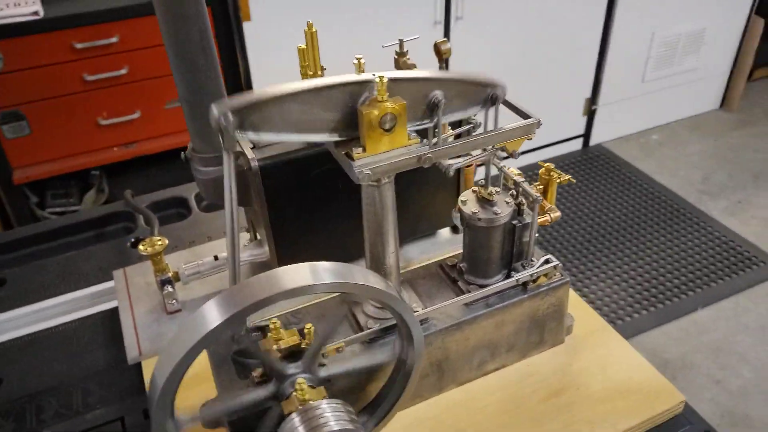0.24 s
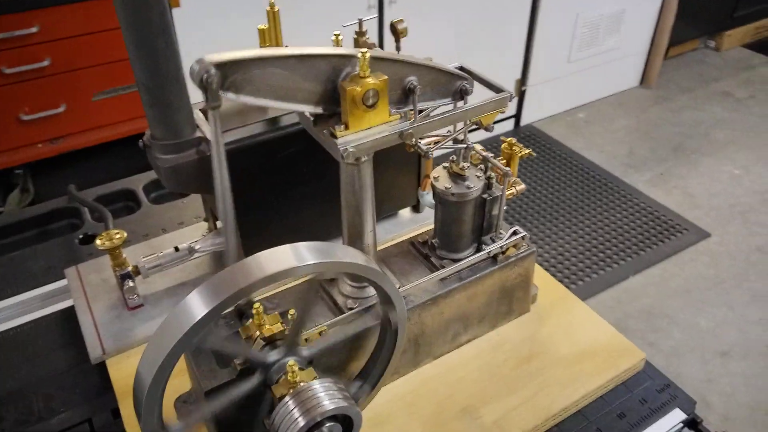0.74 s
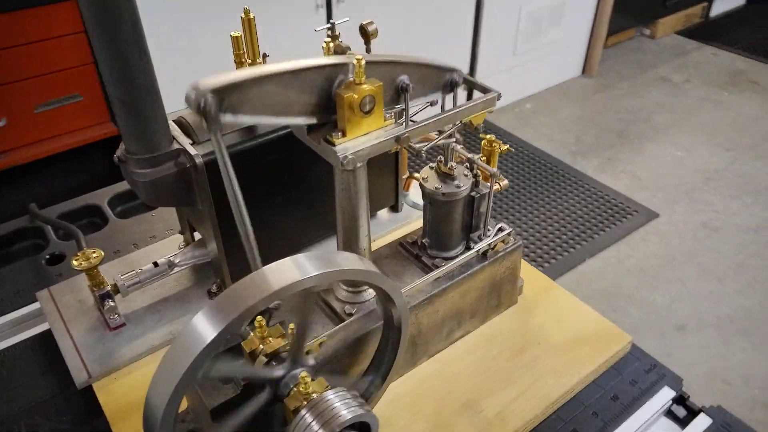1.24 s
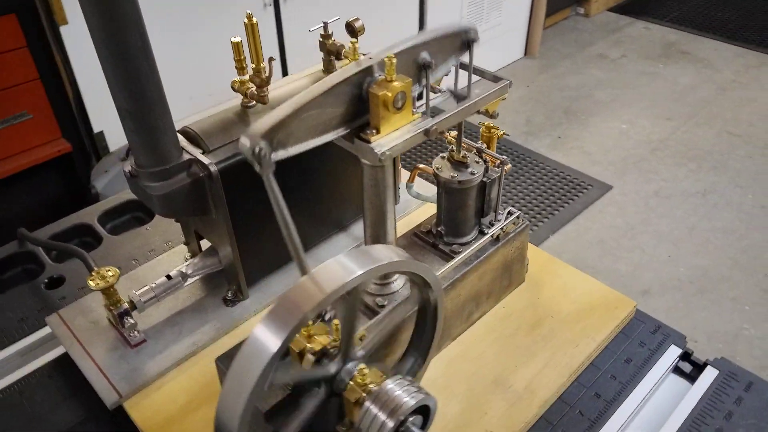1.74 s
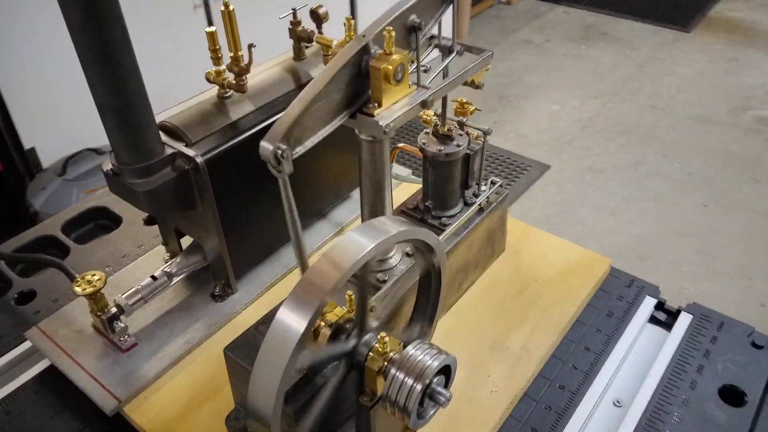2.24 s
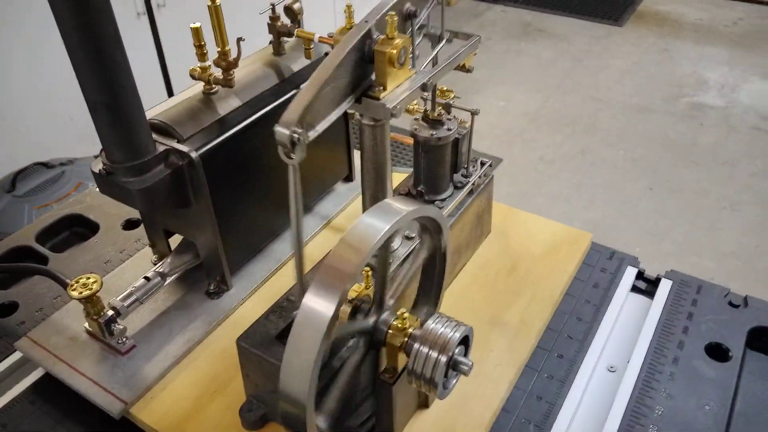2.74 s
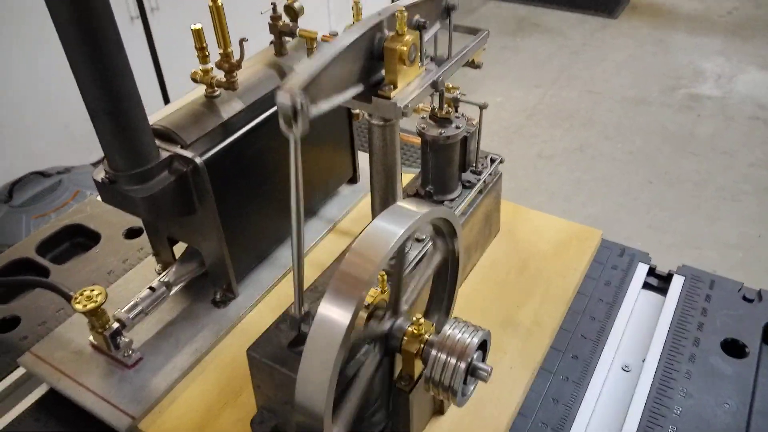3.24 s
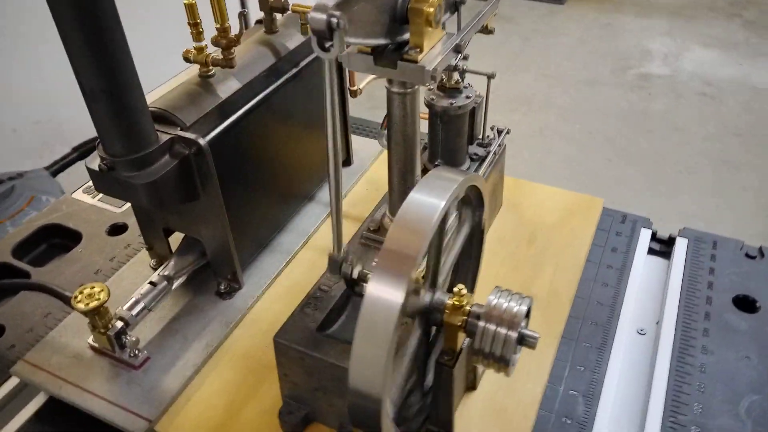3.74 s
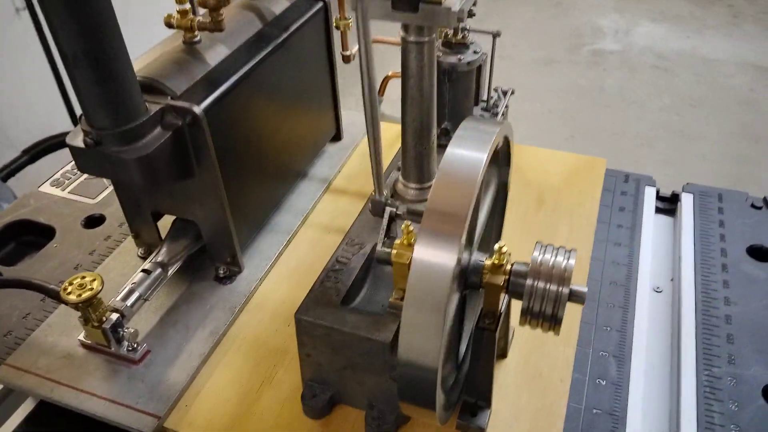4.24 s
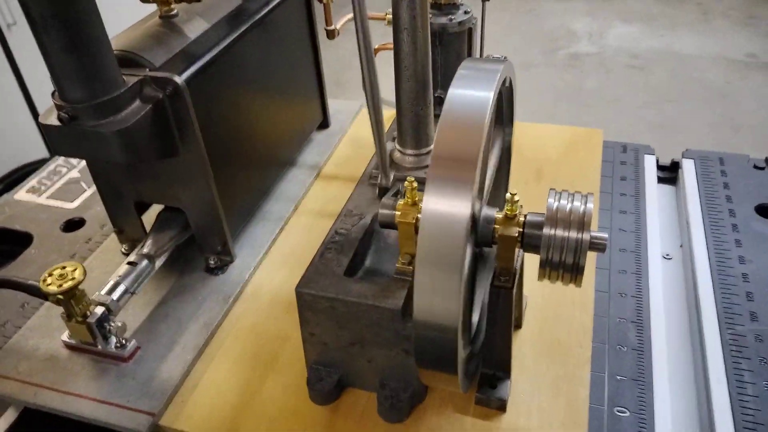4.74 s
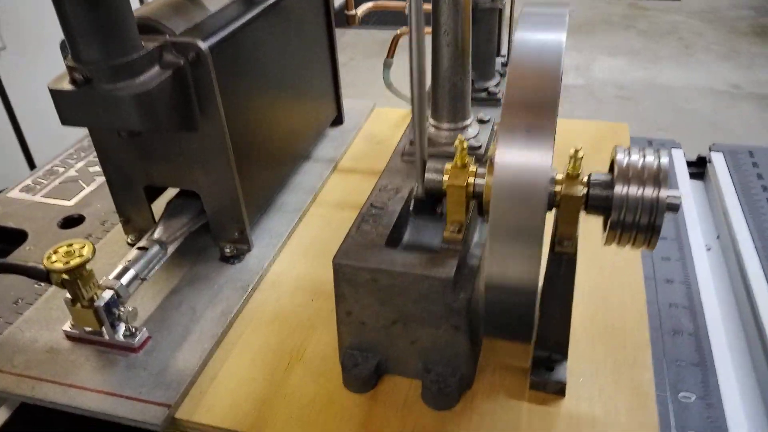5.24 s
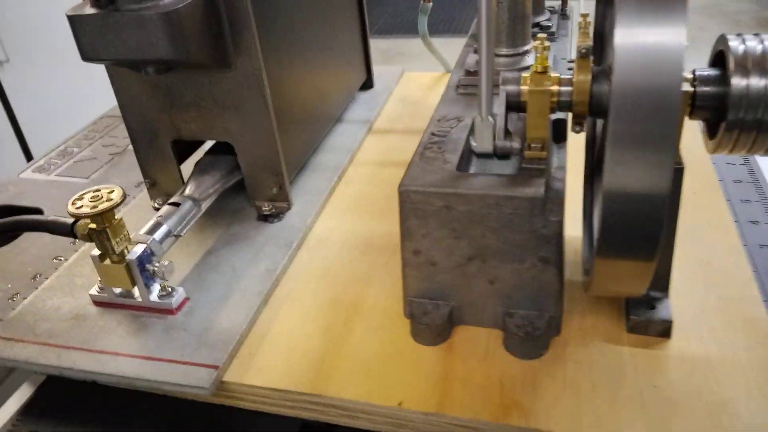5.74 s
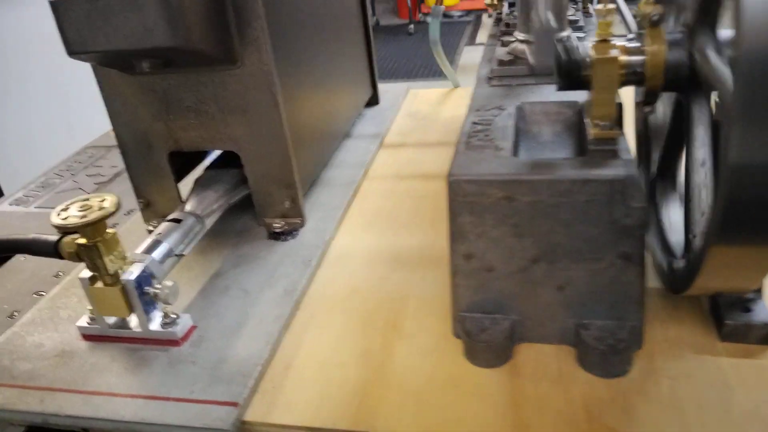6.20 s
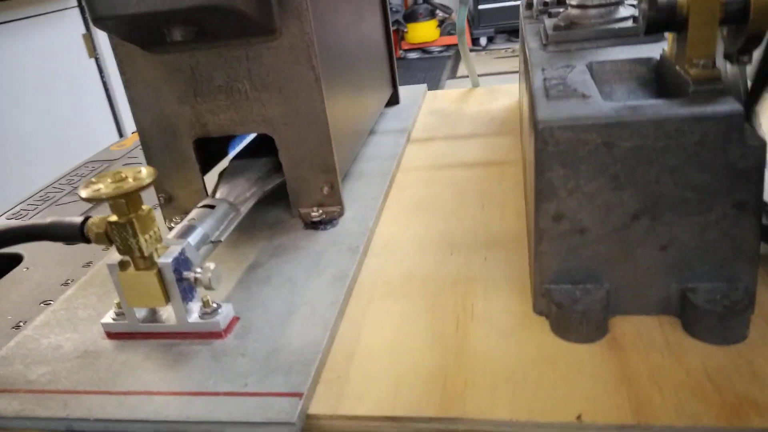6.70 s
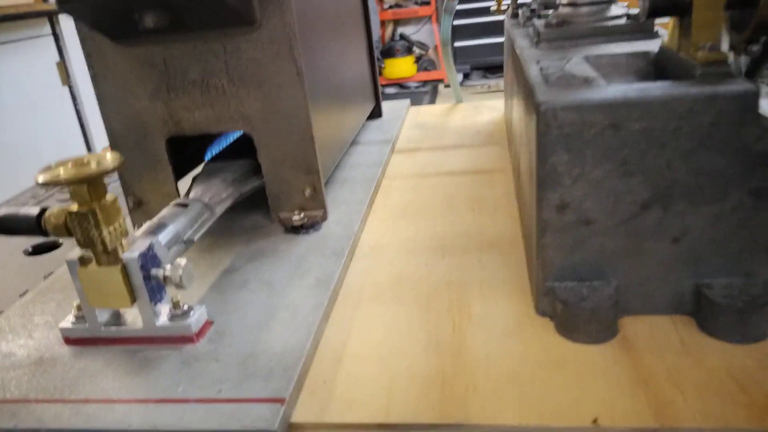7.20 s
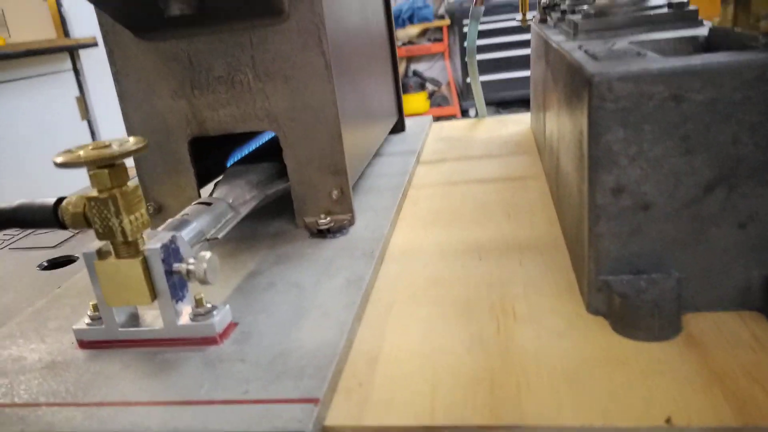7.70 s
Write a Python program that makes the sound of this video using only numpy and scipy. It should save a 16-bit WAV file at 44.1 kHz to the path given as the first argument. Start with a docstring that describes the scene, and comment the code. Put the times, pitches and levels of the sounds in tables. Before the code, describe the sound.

Close handheld stereo in a quiet indoor workshop: steady bright gas-jet hiss, its tone gliding as the microphone moves. Dense little metallic ticks and linkage rattle come first, with a squeaking pin and ragged chuffs; ticks then thin out. Soft bubbling exhaust puffs recur throughout. Later the rattle turns duller, knocks and gurgles thicken again, and the burner hiss swells.

```python
"""A model beam engine runs beside its gas-fired boiler while a camera with two microphones circles the burner.
Throughout, filtered noise makes the jet's hiss, combed by gliding echoes; noise and slips shaken through frame
resonances make the linkage rattle; decaying tones tick, wet exhaust gurgles in puffs, and the room hums faintly.
A dry pin squeals in the first two seconds; dry steam chuffs until 3.5 s, and twice the jet's roar collapses.
From 4.4 s the camera closes in: far echo paths shorten, and the rattle is more shaded from about 5 s."""
import sys
import numpy as np
from scipy import signal
from scipy.fft import rfft, irfft, next_fast_len
from scipy.io import wavfile
from scipy.ndimage import map_coordinates

SR = 44100
rng = np.random.default_rng(int(sys.argv[2]) if len(sys.argv) > 2 else 0)


def materialize(psi):
    """Save the field psi as 16-bit PCM at rate SR to the path in sys.argv[1].

    A 1-D psi becomes a single channel; in a 2-D psi each row is a channel.
    """
    bounded = np.clip(np.atleast_2d(psi).T, -1, 1)
    quanta = np.round(bounded * 32767).astype(np.int16)
    wavfile.write(sys.argv[1], SR, quanta)


N = 351036
TIME = np.arange(N) / SR

# puffs of wet exhaust: t/s, length/s, relative level/dB, lowest resonance at the start f/Hz
PUFFS = [(0.315, 0.07, -83, 410), (0.52, 0.062, -70, 490), (0.755, 0.19, -68, 396),
         (1.175, 0.026, -70, 500), (1.488, 0.065, -73, 540), (1.701, 0.1, -70, 500),
         (1.95, 0.036, -72, 430), (2.111, 0.18, -70, 318), (2.444, 0.041, -72, 466),
         (2.559, 0.1, -71.5, 393), (2.883, 0.15, -71.5, 380), (3.703, 0.2, -70, 332),
         (4.168, 0.047, -76, 414), (4.564, 0.064, -68, 407), (4.688, .07, -70, 417), (4.86, 0.02, -73, 470),
         (5.06, 0.244, -70.5, 300), (5.452, .05, -75, 430), (6.3, 0.091, -68.5, 450),
         (6.53, .25, -65.5, 320), (7.05, 0.077, -69, 430), (7.319, 0.11, -69, 422), (7.53, 0.15, -67, 388),
         (7.774, 0.11, -63, 392)]
PUFF_RELEASE_S, PUFF_RISE_HZ_PER_S = 0.053, 600
# resonances of the exhaust: multiple of the lowest/1, relative level/dB
EXHAUST_MODES = [(1, 5), (1.95, -29), (3.6, -11)]


def gas_jet():
    """Turbulent hiss and beamed fizz, coloured by the echoes at each moving microphone."""
    return swept(jet_flow(), jet_gain, size=2048)


def jet_flow():
    """Turbulence as noise with random spits, fluttering in level; its treble spurts."""
    # flutter: random knots/(1/s), depth/dB
    flutter = [(12, .4), (45, .38)]
    # spurts of brighter fizz: t/s, length/s, boost/dB
    spurts = [(.01, 0.033, 1), (0.625, 0.074, 6), (3.155, 0.059, 7.5), (3.492, 0.077, 6)]
    spits_per_s = 110
    spits = (rng.random(N) < spits_per_s / SR) * rng.uniform(-1.06, 1, N)
    flutter_db = sum(depth_db * wobble(per_s) for per_s, depth_db in flutter)
    flutter_db = flutter_db + 0.1 * np.array([wobble(250), wobble(220)])  # each side apart
    flow = (noise_pair(alike=.88) + 8.5 * spits) * amp(flutter_db)
    spurt_db = sum(db * envelope(s, length, attack_s=0.0052, release_s=0.018) for s, length, db in spurts)
    return flow + filtered(flow, jet_treble) * (amp(spurt_db) - 1)


def jet_treble(hz):
    """Share of the jet that counts as fizz at each frequency."""
    return np.interp(hz, [7500, 9500], [0, 1])


def jet_gain(hz, t):
    """Moving jet spectrum; hiss and fizz each held to a level and pan."""
    # hiss, following the camera's view of the burner: t/s, relative level/dB, pan L-R/dB
    hiss_levels = [(0, -50, -8.5), (.26, -50, -9.5), (.62, -50, -10), (.71, -55, -12.5),
                   (1.15, -55.5, -7.5), (1.6, -51.5, -9), (1.86, -50, -9), (2.25, -47, -7.5),
                   (2.85, -47.5, -9), (3.18, -44, -6), (3.3, -49.5, -8.5), (3.55, -45.5, -7.5),
                   (4.3, -47.5, -8.5), (5.15, -46, -8.5), (5.45, -49, -2.5), (5.9, -47.5, -3.5),
                   (7.0, -47.5, -1.2), (7.919, -40.5, 1)]
    # beamed fizz above the hiss: t/s, relative level/dB, pan L-R/dB
    fizz_levels = [(0, -55.5, 14), (.55, -52.5, 7.5), (.95, -56.5, 7), (1.4, -56, 2.5), (1.9, -55, 5),
                   (2.3, -51, 3), (2.9, -52, 5.5), (3.7, -50.5, 3), (4.6, -49.5, -1), (5.1, -47, 5),
                   (6.15, -46.5, 5), (6.5, -48, 13), (7.05, -47.5, 13), (7.55, -48.5, 18.5),
                   (7.96, -49, 19.5)]
    # the jet reaches the right microphone first: t/s, lag of the left/ms
    left_lag = [(0, 0.16), (2, 0.2), (4, 0.24), (5, 0.257), (7.96, 0.23)]
    left, right = jet_echoes(hz, t)
    no_bass = hz[:, None] ** 4 / (hz[:, None] ** 4 + 1300 ** 4)  # jet too small for low tones
    lagged_left = left * delay(hz, curves(left_lag, t)[0])
    colour = jet_level(hz, t) * no_bass * [lagged_left, right]
    fizz = jet_treble(hz)[:, None]
    hiss_part = at_level(colour * (1 - fizz), hiss_levels, 0.5, t)
    return hiss_part + at_level(colour * fizz, fizz_levels, 3.5, t)


def jet_level(hz, t):
    """Source colour with a moving lower edge, tilt and a roar that collapses and rebuilds."""
    # colour of the jet: f/Hz, left/dB, right/dB
    colour = [(1020, -23, -16.5), (2220, -12, -11.5), (2600, -5, -4.5), (3240, -6.5, -2.5),
              (3920, -6, -5.5), (4350, 0, -6.5), (5370, -1.5, -2), (6440, -1.5, -0.5), (7170, -5.5, -0.5),
              (8370, -3, -7.5), (10300, -8, -15.5), (10800, -7.5, -23), (13500, -7.5, -17.5),
              (15300, -3, -14.5)]
    # lower edge as the burner's mouth comes into view: t/s, edge f/Hz, gain below/dB, tilt/(dB/octave)
    edge = [(0, 3270, -1.5, 8), (1.15, 3180, 0, 0.5), (2.3, 3540, -11, -6), (3.4, 3640, -12.5, -1),
            (4.3, 3040, -7.5, 5), (5.2, 3350, -9.5, 0), (5.9, 2700, 2, 1.5), (6.9, 2510, -14.5, -0.5),
            (7.96, 2920, -13, -2)]
    # mid-treble roar, collapsing at a spurt and slowly rebuilding: t/s, relative level/dB
    roar = [(0, 0), (.62, -1.5), (.67, -6.5), (1.2, -2), (1.55, 1.5), (3.19, 1), (3.24, -6), (3.6, 0.5),
            (4.2, 1.5)]
    roar_hz, roar_width_hz = 4700, 890
    edge_hz, drop_db, tilt_db = curves(edge, t)
    octaves = np.log2(np.clip(hz, 3500, 7500) / 5500)[:, None]
    roar_db = curves(roar, t)[0] * np.exp(-((hz[:, None] - roar_hz) / roar_width_hz) ** 2)
    below_edge_db = drop_db / (1 + (hz[:, None] / edge_hz) ** 20)
    return amp(along(colour, hz)[..., None] + below_edge_db + tilt_db * octaves + roar_db)


def jet_echoes(hz, t):
    """Interference of near and far echoes with the jet, separately at each microphone."""
    # near echoes, left: pressure share/1, delay/ms at each of the four camera places
    echoes_left = [(0.21, 0.331, 0.263, 0.26, 0.18), (0.2, 0.226, 0.303, 0.308, 0.2515),
                   (0.06, 0.475, 0.475, 0.47, 0.283), (0.15, 0.868, 0.726, 0.807, 0.745),
                   (0.24, 0.762, 1.081, 0.99, 0.87)]
    # near echoes, right: same columns
    echoes_right = [(0.24, 0.13, 0.27, 0.29, 0.419), (0.38, 0.25, 0.17, 0.15, 0.208),
                    (0.15, 0.411, 0.48, 0.29, 0.408), (0.14, 0.744, 0.914, 0.623, 0.575),
                    (0.22, 0.885, 1, 0.902, 0.8)]
    # near surface cancels or reinforces, left: gain/dB, half width/Hz, path of (t/s, f/Hz)
    bands_left = [(-19, 380, [(1.25, 7900), (1.95, 8100), (2.35, 9400), (4.4, 9300), (4.95, 8900)]),
                  (-25, 360, [(4.55, 6340), (5.15, 6740), (5.5, 7470), (6.1, 8460)]), (12, 92, [(5.2, 5700),
                  (6.2, 6630), (6.9, 7160)]), (-1, 200, [(5.4, 9850), (6.2, 11000)]),
                  (-11, 500, [(3.75, 8560), (4.3, 8200)]), (-10, 360, [(0, 13500), (1, 13500), (2.2, 13200),
                  (3, 13300)]), (-26, 410, [(3.2, 14400), (4.1, 14900)]), (-15, 340, [(0, 12200),
                  (.9, 11440)]), (4.5, 380, [(2.6, 12800), (4.4, 13500)]), (6, 650, [(5, 11600),
                  (5.6, 12600), (6, 14000)]), (-11, 200, [(5.45, 11100), (5.85, 11900), (6.4, 12600),
                  (6.9, 13000), (7.96, 12600)]), (-15, 400, [(6.6, 8140), (7.1, 10040), (7.6, 12300)]),
                  (-36, 530, [(7.05, 7060), (7.55, 7860), (7.96, 8500)]), (-23, 220, [(3.3, 3360),
                  (5.4, 3600), (6.4, 3770), (6.85, 4720)]), (9.5, 200, [(0, 4340), (1.2, 4200)]),
                  (8, 180, [(0, 5700), (.8, 6160), (1.6, 5900)]), (-25, 140, [(1.9, 4730), (3.1, 4850)]),
                  (-14, 260, [(0, 6650), (1, 7600), (2.2, 7300), (3.2, 7400)]), (-10, 710, [(7, 3230),
                  (7.96, 3530)]), (5.5, 110, [(2.7, 5070), (4.6, 4980), (5.6, 5300)]),
                  (6.5, 200, [(.3, 12900), (.85, 12400)])]
    # near surface, right: same columns
    bands_right = [(-20, 195, [(2.2, 9450), (3, 9500), (3.7, 9440), (4.5, 9400)]), (-15, 460, [(1.8, 13400),
                   (4, 13400), (4.8, 12800)]), (-8.5, 260, [(2.3, 5630), (4.1, 5500), (4.55, 5240)]),
                   (-11, 200, [(2, 8050), (2.5, 7800), (3.9, 7860)]), (4.5, 600, [(2.1, 15100),
                   (4.5, 15000)]), (-10, 550, [(6.45, 10500), (7.96, 10300)]), (-16, 450, [(6.6, 15000),
                   (7.96, 14400)]), (-13.5, 90, [(2.4, 3290), (4.6, 3570)]), (-4, 370, [(5.45, 7500),
                   (6.2, 7100)]), (-12, 130, [(0, 6140), (1.2, 6100)]), (-9, 200, [(0, 7200), (1.2, 6850),
                   (2.2, 6400), (3.9, 6700)]), (4.5, 380, [(0, 6600), (1.1, 6500)]),
                   (5.5, 170, [(1.8, 5150), (3.1, 5080)]), (11, 72, [(3.3, 3580), (5.8, 3720)]),
                   (-26, 350, [(7.3, 5740), (7.96, 6100)]), (-17, 160, [(6.7, 3700), (7.96, 3810)]),
                   (-17, 276, [(0, 2920), (1.5, 3070), (3, 2920)]), (9, 230, [(1.9, 4500), (2.6, 4400),
                   (3.9, 4300)]), (4.5, 510, [(3.4, 6100), (4.3, 6300), (4.95, 7030)]),
                   (2.5, 300, [(4.95, 5770), (5.25, 5630)]), (7.5, 500, [(5.1, 5700), (5.8, 5860),
                   (6.25, 6200)])]
    ears = []
    for echoes, bands in ((echoes_left, bands_left), (echoes_right, bands_right)):
        far = far_comb(hz, t, strength=1.5, drift_ms=.02, shortest_ms=1.2, longest_ms=6)
        ears.append(near_comb(echoes, hz, t) * gliding_bands(bands, hz, t) * far)
    return ears


def near_comb(echoes, hz, t):
    """Near surfaces cut notches that glide as the camera moves from place to place."""
    # camera: t/s, place/1 (0 front, 1 by the flywheel, 2 low by the base, 3 burner; held within 0..3)
    camera = [(0, 0.5), (1.1, -0.05), (2.4, 2.5), (4.3, 1), (5.6, 2.5), (6.6, 2.5), (7.96, 4)]
    place = curves(camera, t)[0]
    combs = []
    for share, *ms in echoes:
        path_ms = np.interp(place, range(len(ms)), ms)
        combs.append(abs(1 + share * delay(hz, path_ms)))
    return np.prod(combs, axis=0)


def far_comb(hz, t, strength, drift_ms, shortest_ms, longest_ms, count=8):
    """Many echoes of wavering strength; their ripple sways with the hand and glides up on approach."""
    approach_s, glide_per_s, sway_per_s = 4.4, .1, 2.6
    paths_ms = np.geomspace(shortest_ms, longest_ms, count) * rng.uniform(.9, 1.1, count)
    shrink = np.exp(-glide_per_s * np.maximum(t - approach_s, 0))
    shares = np.array([wobble(sway_per_s, t) for _ in paths_ms])
    shares = shares / np.linalg.norm(shares, axis=0)
    ripple = 0
    for ms, share in zip(paths_ms, shares):
        ripple = ripple + share * delay(hz, ms * shrink + drift_ms * wobble(sway_per_s, t))
    return (1 + strength * ripple) / np.sqrt(1 + strength ** 2)


def linkage():
    """Sliding rods and pins shake the frame with rubbing and many tiny slips."""
    # rods and pins sliding under load: t/s, length/s, relative level/dB
    rubs = [(.1, 0.062, -64), (.31, 0.034, -63.5), (.38, 0.4, -67.5), (.78, 0.17, -71.5), (1.01, 0.18, -70),
            (1.26, 0.058, -75), (1.45, 0.12, -73), (1.64, .07, -74), (1.72, 0.12, -67.5),
            (1.94, 0.076, -72), (2.19, 0.016, -74), (2.31, 0.14, -77), (2.44, 0.088, -66.5),
            (2.62, 0.15, -71.5), (2.83, 0.12, -78.5), (2.98, 0.1, -71), (3.18, 0.099, -66),
            (3.53, 0.11, -73), (3.78, .15, -78.5), (3.96, 0.043, -65), (4.17, 0.066, -77),
            (4.57, 0.09, -70.5), (4.74, 0.13, -73.5), (4.98, 0.12, -67.5), (5.26, 0.088, -73),
            (5.45, 0.063, -72), (5.6, 0.46, -74), (6.07, 0.1, -67), (6.37, 0.061, -71), (6.47, 0.16, -65.5),
            (6.62, 0.26, -70), (7.05, 0.15, -65.5), (7.26, 0.13, -65.5), (7.45, 0.32, -66.5),
            (7.78, 0.15, -61.5)]
    idle_db, pan_db, stick_slip_db = -81, -0.5, 2
    slips = grainy(per_s=130, share=0.46, alike=0.75)
    rattle = unit(swept(filtered(slips, frame), rattle_gain))
    load = np.hypot(amp(idle_db), strokes(rubs, attack_s=.005, release_s=.04))
    return rattle * load * amp(stick_slip_db * wobble(30)) * panned(pan_db)


def rattle_gain(hz, t):
    """The base shades the rattle as the camera sinks; bands and echoes colour it by place."""
    # shading: t/s, upper edge f/Hz
    top = [(0, 3100), (3.6, 2900), (5, 1900), (7.96, 1870)]
    # colour changes with place: gain/dB, half width/Hz, path of (t/s, f/Hz)
    bands = [(-11, 100, [(6.7, 1010), (7.96, 970)]), (-2.5, 170, [(2.6, 694), (4, 714)]),
             (2, 43, [(2.7, 1050), (5.3, 1050)]), (6, 78, [(5.4, 1630), (7.5, 1620)]), (6, 140, [(3, 2010),
             (4.45, 2020)]), (-6, 140, [(5.2, 920), (6, 910)]), (-4.5, 160, [(1.3, 1610), (2.3, 1700)]),
             (-8, 220, [(.85, 1800), (1.15, 1600)]), (4, 200, [(4.9, 1400), (5.35, 1420)])]
    shade = 1 / (1 + (hz[:, None] / curves(top, t)[0]) ** 7)
    far = [far_comb(hz, t, strength=2.26, drift_ms=0.596, shortest_ms=1.527, longest_ms=5.86)
           for _ in "LR"]
    return shade * gliding_bands(bands, hz, t) * np.array(far)


def frame(hz):
    """Resonances of the engine frame, summed with alternating sign."""
    # modes: f/Hz, width/Hz, relative level/dB
    modes = [(589, 166, -0.5), (732, 177, 2.5), (992, 32, 4), (1123, 65, -2), (1443, 290, -1.5),
             (2044, 200, -3.5)]
    total = 0
    for k, (centre, width, db) in enumerate(modes):
        damping = 1j * hz * width
        total = total + (-1) ** k * amp(db) * damping / (centre * centre - hz * hz + damping)
    return total


def dry_pin():
    """Sliding friction as noise, ringing one narrow resonance in bursts."""
    # squeals: t/s, length/s, relative level/dB
    squeals = [(.38, 0.027, -59.5), (.46, 0.046, -62.5), (.6, 0.061, -65.5), (.75, 0.06, -63),
               (.85, 0.06, -64.5), (1.05, 0.012, -68), (1.49, 0.0089, -64), (1.555, 0.047, -70.5),
               (1.66, 0.024, -68), (1.72, 0.015, -67), (1.82, .02, -64), (1.92, 0.12, -66.5)]
    pin_hz, width_hz = 1000, 55
    song = unit(filtered(noise_pair(alike=0.29), lambda hz: 1 / (1 + ((hz - pin_hz) / width_hz) ** 2)))
    left_right_db = [[-3.5], [.5]]
    return song * strokes(squeals, attack_s=.003, release_s=.026) * amp(left_right_db)


def exhaust():
    """Wet steam spatters through hollow resonances that rise during each puff."""
    idle_db, spatter_db = -88, -7  # between puffs, before the trim; trim of the whole
    drops = grainy(per_s=110, share=0.4, alike=0.64)
    gurgle = unit(swept(drops, exhaust_gain) * amp(3.0 * wobble(45)))
    steam = np.hypot(amp(idle_db), strokes(PUFFS, attack_s=0.0077, release_s=PUFF_RELEASE_S))
    return gurgle * steam * amp(spatter_db)


def exhaust_gain(hz, t):
    """Resonances climb from each puff's starting pitch while it lasts."""
    s, length, _, start_hz = np.transpose(PUFFS)
    puff = np.maximum(np.searchsorted(s, t) - 1, 0)
    centre = start_hz[puff] + PUFF_RISE_HZ_PER_S * np.clip(t - s[puff], 0, length[puff])
    return sum(amp(db) / (1 + ((hz[:, None] - multiple * centre) / 140) ** 2) ** 2
               for multiple, db in EXHAUST_MODES)


def gulps(count=12):
    """Steam breaks through condensate in quick bursts, ringing the exhaust at a rising, scattered pitch."""
    gulps_per_s, jitter_beats, swell_s = 29, .13, .004
    gulp_db, growth_db_per_s = 0.5, 22
    out, t = np.zeros((2, N)), np.arange(SR // 20) / SR
    shape = t / swell_s * np.exp(1 - t / swell_s)
    for s, length, db, start_hz in PUFFS:
        for beat, (late, loud, sharp, turn) in enumerate(rng.standard_normal((count, 4))):
            age = max(beat + jitter_beats * late, 0) / gulps_per_s
            steam_s = min(age, length)
            hz = (start_hz + PUFF_RISE_HZ_PER_S * steam_s) * (1 + 0.042 * sharp)
            fade = np.exp(-max(age - length, 0) / PUFF_RELEASE_S)
            size = amp(db + gulp_db + growth_db_per_s * steam_s + loud) * fade
            phase = 0.38 * turn * np.array([[1], [-1]])  # opposite left and right
            ring = sum(amp(mode_db - EXHAUST_MODES[0][1]) * np.sin(2 * np.pi * multiple * hz * t + phase)
                       for multiple, mode_db in EXHAUST_MODES)
            add(out, s + age, size * shape * ring)
    return out


def chuffs():
    """Short, ragged blasts of dry steam: grainy noise, brighter than the rattle."""
    # blasts: t/s, length/s, level/dB
    blasts = [(.11, 0.058, -66), (.38, .04, -70), (.625, 0.1, -68.5), (2.44, 0.093, -70), (3, 0.027, -70),
              (3.18, .06, -75), (3.51, .06, -63.5)]
    # colour: f/Hz, relative density/dB
    colour = [(400, -35), (1000, 0), (1500, 3.5), (2200, -1), (2900, -3), (3600, -13), (6000, -52)]
    spray = grainy(per_s=160, share=0.35, alike=0.49)
    spray = unit(filtered(spray, lambda hz: amp(along(colour, hz))))
    return spray * strokes(blasts, attack_s=0.0098, release_s=0.031)


def ticks():
    """Bearing play taken up: a crack, a short ring and a brief scatter from the bench."""
    # knocks: t/s, relative level/dB, ring f/Hz, crack over the ring/dB
    knocks = [(.071, -58, 730, 12), (.105, -53, 970, 11), (.147, -54, 970, 8), (.16, -51, 970, 6),
              (.308, -55.5, 625, 16), (.388, -46, 980, 10), (.478, -52, 970, 1), (.55, -51, 625, 12),
              (.603, -52, 1000, 5), (.625, -58, 1100, 13), (.684, -51, 1070, 12), (.724, -49, 706, 13),
              (.753, -50, 950, 6), (.82, -54, 1120, 6), (.855, -50, 560, 4), (.897, -50, 990, 5),
              (.907, -50, 650, 5), (1.056, -55, 970, 5), (1.13, -52.5, 900, 7), (1.212, -59, 700, 6),
              (1.451, -57, 1050, 13), (1.497, -54, 940, 3), (1.558, -54, 720, 5), (1.591, -55, 960, 3),
              (1.725, -59, 950, 4), (1.774, -51, 980, 14), (1.828, -50, 970, 9), (1.848, -53, 970, 12),
              (1.929, -51, 970, 0), (1.977, -56, 1020, 10), (2.338, -56, 1290, 6), (2.44, -53, 1370, 14),
              (2.492, -52, 1910, 15), (2.649, -59, 1400, 9), (3.003, -55, 1600, 10), (3.177, -46, 660, 20),
              (3.27, -58, 1250, 12), (3.512, -58, 1610, 10), (3.559, -50, 1150, 1), (3.574, -57, 1150, 8),
              (3.977, -53, 1100, 19), (4.569, -58, 592, 8), (4.626, -52, 970, 5), (4.751, -48, 556, 11),
              (4.857, -50, 503, 9), (4.996, -57, 620, 6), (5.277, -56, 1410, 5), (5.465, -62, 694, 7),
              (5.77, -54, 820, 4), (6.075, -51, 1020, 12.5), (6.104, -55, 850, 12), (6.207, -57, 650, 6),
              (6.341, -56, 520, 5), (6.39, -51, 571, 7), (6.432, -46.5, 685, 3), (6.485, -48, 1120, 9),
              (6.55, -59, 1100, 11), (6.608, -57, 1450, 8), (6.668, -55, 1400, 6), (6.827, -48.5, 745, 5),
              (7.055, -55, 760, 13), (7.15, -58, 700, 11), (7.277, -56, 1290, 14), (7.346, -51, 760, 10),
              (7.412, -60, 650, 9), (7.6, -53, 597, 6), (7.704, -49, 770, 1), (7.772, -51, 1000, 10),
              (7.811, -46.5, 1000, 13), (7.836, -50, 1230, 10), (7.907, -58, 1150, 12)]
    ring_t60_s, crack_t60_s, scatter_t60_s = 0.038, 0.0046, .09
    trim_db = -7.5
    out, t = np.zeros((2, N)), np.arange(SR // 8) / SR
    for s, db, hz, crack_db in knocks:
        ring = np.sin(2 * np.pi * hz * t) * amp(-60 * t / ring_t60_s)
        crack = amp(crack_db) * rng.standard_normal((2, len(t))) * amp(-60 * t / crack_t60_s)
        scatter = .55 * rng.standard_normal((2, len(t))) * amp(-60 * t / scatter_t60_s)
        add(out, s, amp(db + trim_db) * (ring + crack + scatter))

    def body(hz):  # high-pass 300 Hz, low-pass 2200 Hz
        return 1j * hz / (300 + 1j * hz) / (1 + 1j * hz / 2200 - (hz / 2200) ** 2)
    return filtered(out, body)


def bumps():
    """Soft, low knocks: decaying low noise without any ring."""
    # thumps: t/s, level at the start/dB, t60/s
    thumps = [(0.098, -74, 0.36), (3.18, -60, 0.087), (3.221, -71, 0.34), (3.478, -64, 0.16),
              (3.51, -65, 0.16), (6.099, -68, 0.42), (7.802, -74, 0.87)]
    colour = [(30, -22), (90, 0), (220, 12.0), (420, -3), (1500, -58)]  # f/Hz, relative density/dB
    out, t = np.zeros((2, N)), np.arange(SR // 4) / SR
    attack = 1 - np.exp(-t / 0.00077)
    for s, db, t60 in thumps:
        thud = unit(filtered(noise_pair(alike=0.83), lambda hz: amp(along(colour, hz))))
        add(out, s, amp(db - 60 * t / t60) * attack * thud[:, :len(t)])
    return out


def workshop():
    """Quiet room noise and a faint hum, unsteady in level and phase."""
    # room noise: f/Hz, relative density/dB
    room = [(15, -32), (30, 1.5), (90, 3.5), (150, -1), (350, -0.5), (650, -3), (900, -35), (1600, -20),
            (2400, -13.5), (4000, -66)]
    # hum: f/Hz, rms level about which it wavers/dB
    hum_tones = [(180, -92), (241, -94.5)]
    air = amp(-81) * unit(filtered(noise_pair(alike=0.68), lambda hz: amp(along(room, hz))))
    hum = 0
    for hz, db in hum_tones:
        tone = np.sqrt(2) * np.sin(2 * np.pi * hz * TIME + 1.6 * wobble(13))
        hum = hum + amp(db + 3.0 * wobble(6)) * tone
    return air + hum


def amp(db):
    """Decibels to gain."""
    return 10 ** (np.asarray(db) / 20)


def unit(x):
    """Scale to rms 1."""
    return x / np.sqrt(np.mean(x ** 2) + 1e-20)


def along(points, hz):
    """Each column of a (f/Hz, ..) table on a log-frequency axis."""
    f, *cols = np.transpose(points)
    return np.array([np.interp(np.log(hz + 1), np.log(f + 1), c) for c in cols])


def curves(rows, t):
    """Each column of a (t/s, ..) table at the times t."""
    s, *cols = np.transpose(rows)
    return np.array([np.interp(t, s, c) for c in cols])


def wobble(rate, t=TIME):
    """A smooth random curve, rate knots a second."""
    knots = rng.standard_normal(int(N * rate / SR) + 4)
    return map_coordinates(knots, [t * rate], mode="nearest")


def filtered(x, response):
    """x times a response of frequency."""
    m = next_fast_len(N + SR // 2)
    return irfft(rfft(x, m) * response(np.fft.rfftfreq(m, 1 / SR)), m)[..., :N]


def swept(x, gain, size=1024):
    """x through a moving filter gain(f/Hz, t/s)."""
    window = dict(fs=SR, nperseg=size, noverlap=size - size // 3)
    hz, t, z = signal.stft(x, **window)
    return signal.istft(z * gain(hz, t), **window)[1][..., :N]


def noise_pair(alike):
    """White noise at two microphones with a share of its power in common."""
    share = np.clip(alike, 0, 1)
    return np.sqrt(share) * rng.standard_normal(N) + np.sqrt(1 - share) * rng.standard_normal((2, N))


def grainy(per_s, share, alike):
    """Noise with a share of its power in separate random pulses."""
    share = np.clip(share, 0, 1)
    pulses = (rng.random(N) < per_s / SR) * rng.uniform(0.15, 1, N) * rng.choice([-1, 1], N)
    return np.sqrt(share) * unit(pulses) + np.sqrt(1 - share) * noise_pair(alike)


def delay(hz, ms):
    """Phase turn of a changing delay at each frequency and moment."""
    phase = (2 * np.pi * np.outer(hz, ms / 1000)).astype(np.float32)
    return np.cos(phase) - 1j * np.sin(phase)


def gliding_bands(bands, hz, t):
    """Gain of notches and ridges that slide in pitch as the camera moves."""
    fade_s = 0.18
    total_db = np.zeros((len(hz), len(t)))
    for db, width_hz, path in bands:
        outside_s = np.maximum(np.maximum(path[0][0] - t, t - path[-1][0]), 0)
        centre = curves(path, t)[0]
        near = abs(hz - centre.mean()) < np.ptp(centre) + 3 * width_hz
        offset = (hz[near, None] - centre) / width_hz
        total_db[near] += db * np.exp(-offset ** 2 - (outside_s / fade_s) ** 2)
    return amp(total_db)


def envelope(s, length, attack_s, release_s, t=TIME):
    """Rise at time s, hold for the length, then die away."""
    rise = 1 - np.exp(-np.clip((t - s) / attack_s, 0, 20))
    return rise * np.exp(-np.clip((t - s - length) / release_s, 0, 20))


def strokes(rows, attack_s, release_s, size=16):
    """Loudest envelope at each moment of (t/s, length/s, level/dB, ..) events."""
    t = TIME[::size]
    events = [amp(db) * envelope(s, length, attack_s, release_s, t) for s, length, db, *_ in rows]
    return np.interp(TIME, t, np.max(events, axis=0))


def panned(pan_db):
    """Left and right gains for a level difference."""
    return amp(np.vstack([pan_db, -pan_db]) / 2)


def at_level(band, rows, gain_db, t):
    """Bring a moving stereo filter to a (t/s, level/dB, L-R/dB) table plus a trim."""
    level_db, pan_db = curves(rows, t)
    rms = np.sqrt(np.mean(abs(band) ** 2, axis=1, keepdims=True))
    return band / rms * (amp(level_db + gain_db) * panned(pan_db))[:, None]


def add(track, s, sound):
    """Mix a sound into a track at time s."""
    part = track[..., max(round(s * SR), 0):][..., :sound.shape[-1]]
    part += sound[..., :part.shape[-1]]


def scene():
    """Burner, engine and room together."""
    engine = linkage() + dry_pin() + exhaust() + gulps() + chuffs() + ticks() + bumps()
    return gas_jet() + engine + workshop()


def record(dry):
    """The camera keeps nothing above its band limit."""
    top_hz = 15620
    return filtered(dry, lambda hz: hz < top_hz)


dry = scene()
out = record(dry)
materialize(out)
```